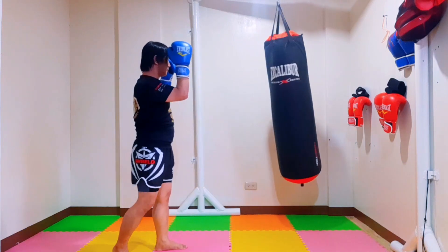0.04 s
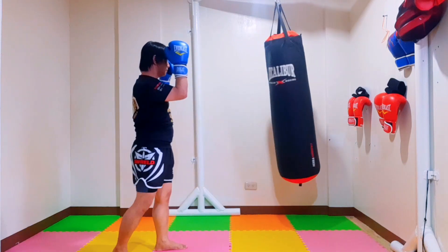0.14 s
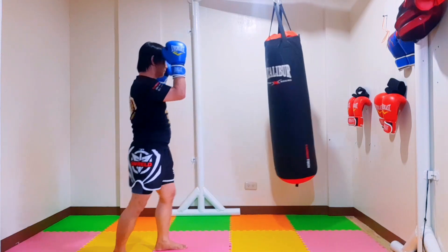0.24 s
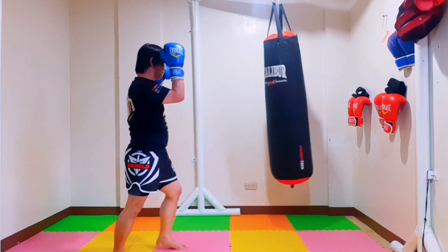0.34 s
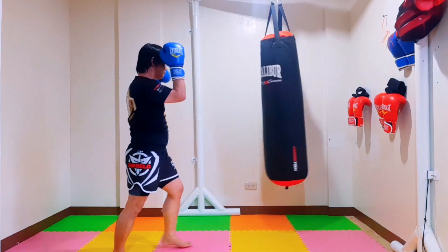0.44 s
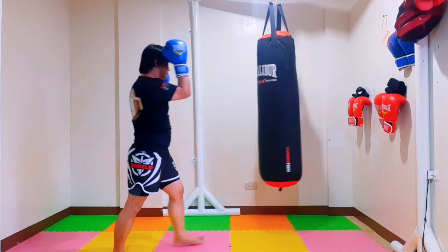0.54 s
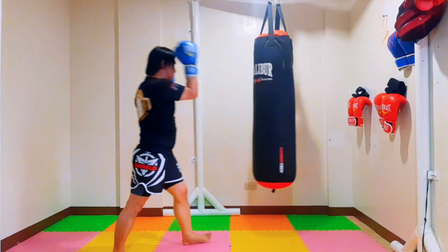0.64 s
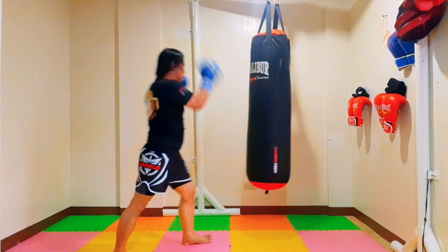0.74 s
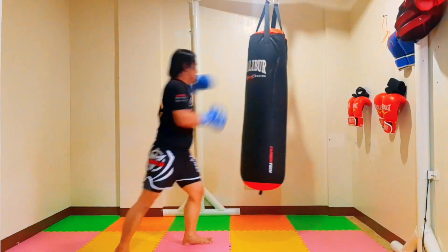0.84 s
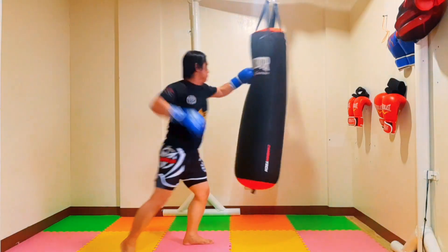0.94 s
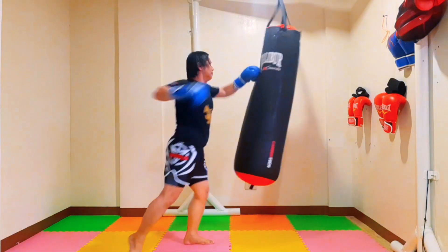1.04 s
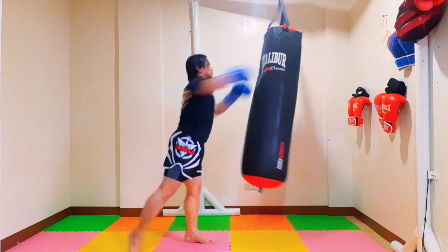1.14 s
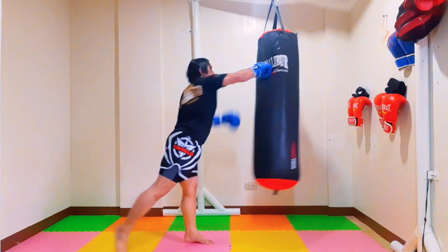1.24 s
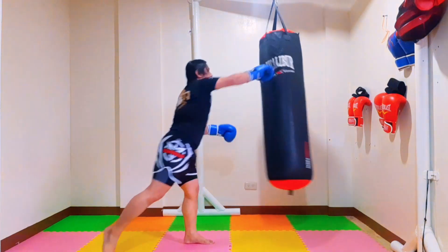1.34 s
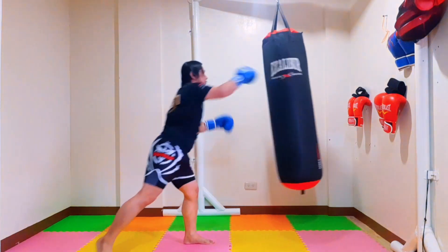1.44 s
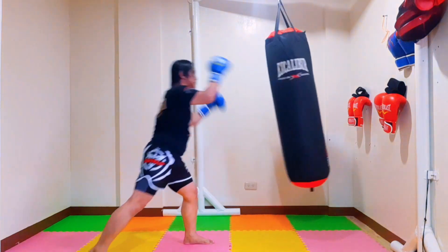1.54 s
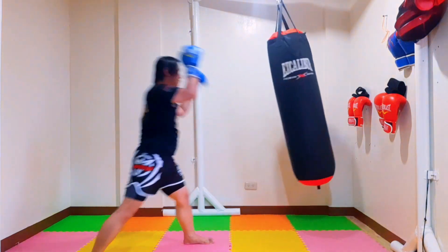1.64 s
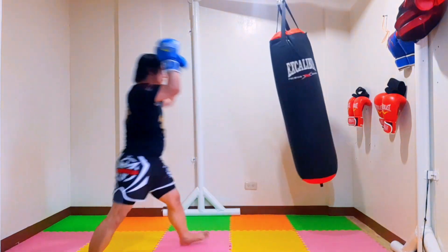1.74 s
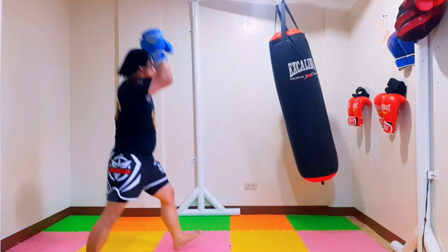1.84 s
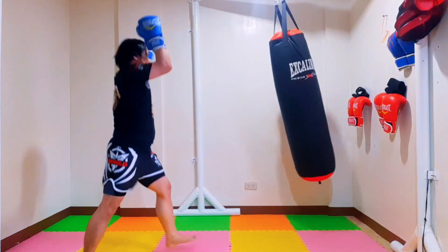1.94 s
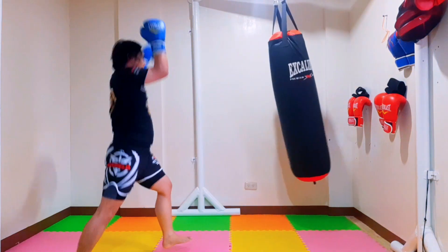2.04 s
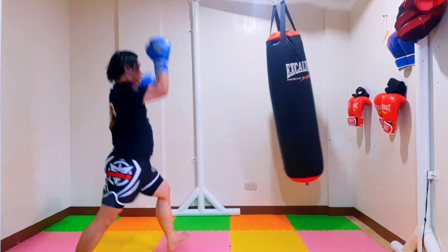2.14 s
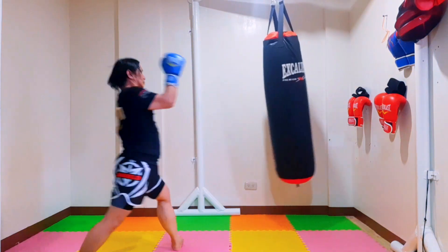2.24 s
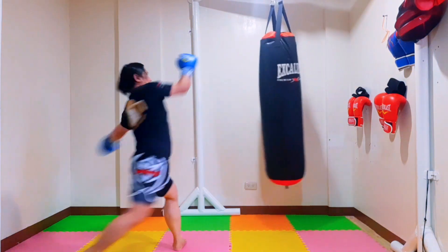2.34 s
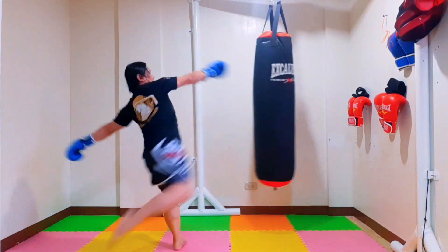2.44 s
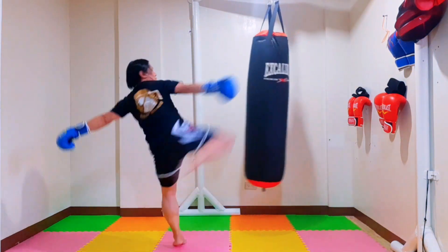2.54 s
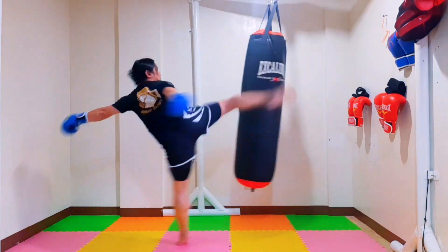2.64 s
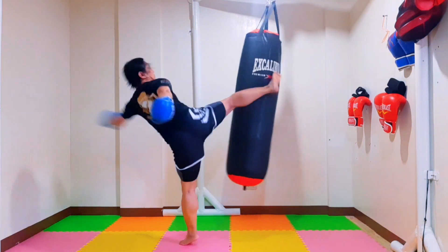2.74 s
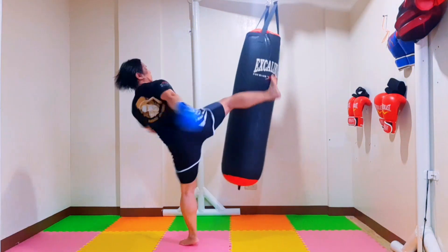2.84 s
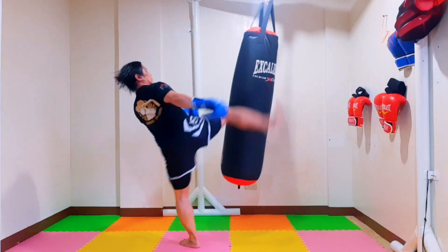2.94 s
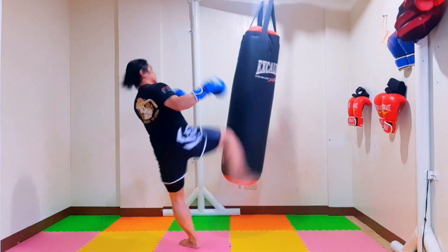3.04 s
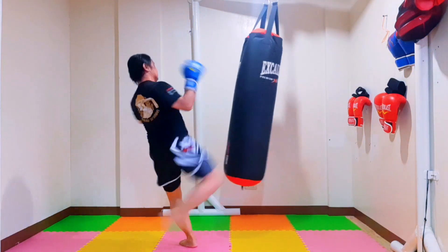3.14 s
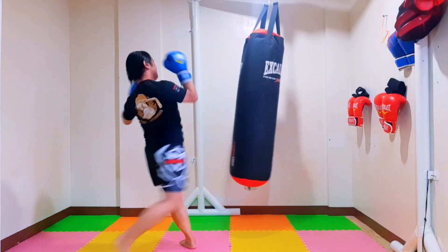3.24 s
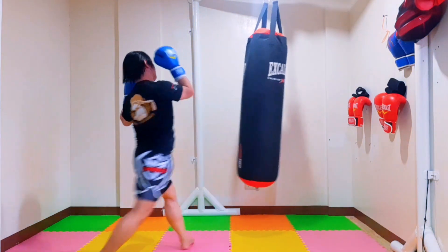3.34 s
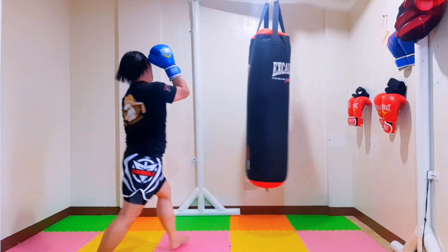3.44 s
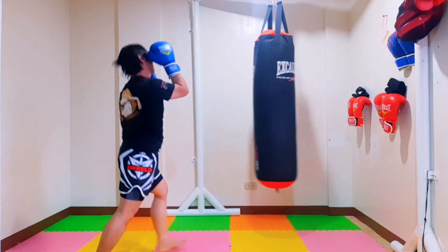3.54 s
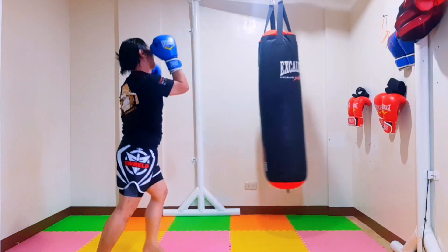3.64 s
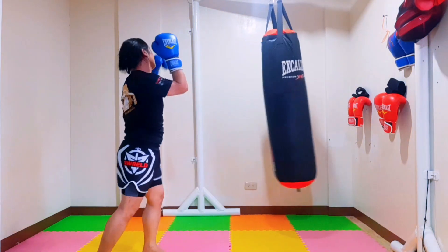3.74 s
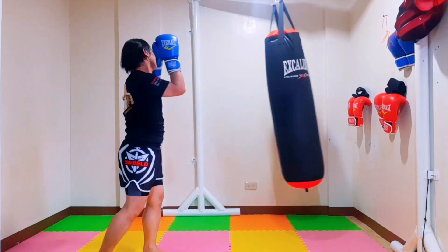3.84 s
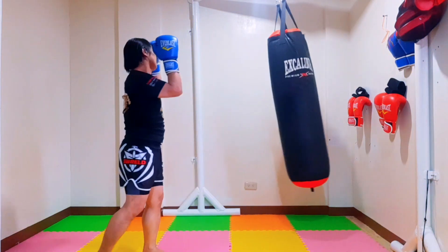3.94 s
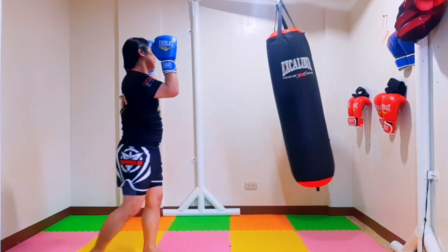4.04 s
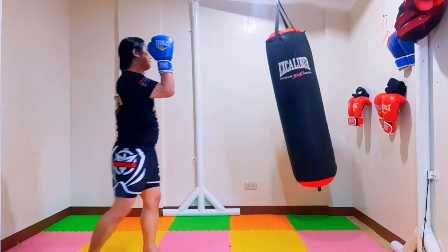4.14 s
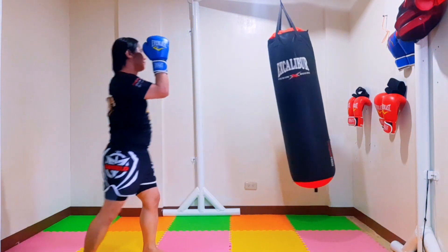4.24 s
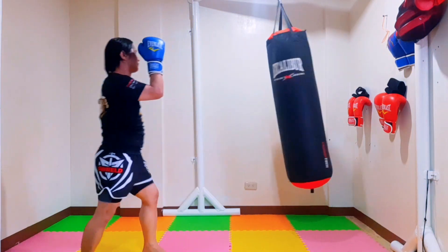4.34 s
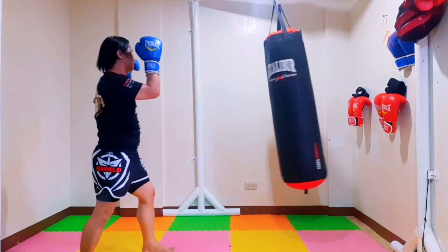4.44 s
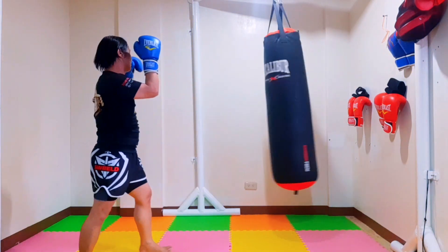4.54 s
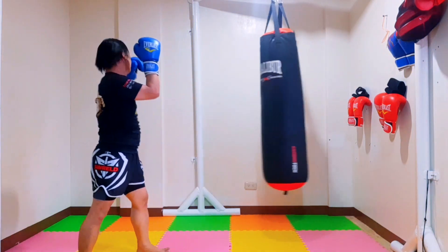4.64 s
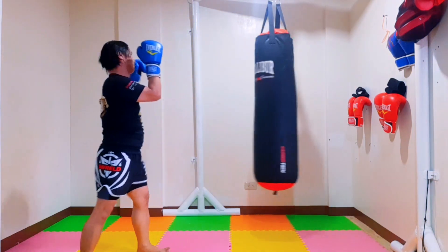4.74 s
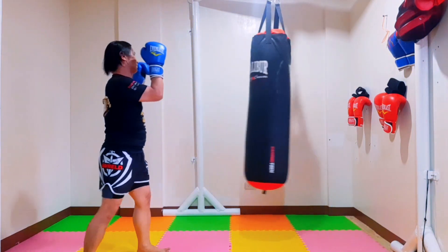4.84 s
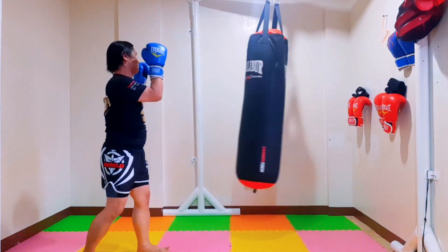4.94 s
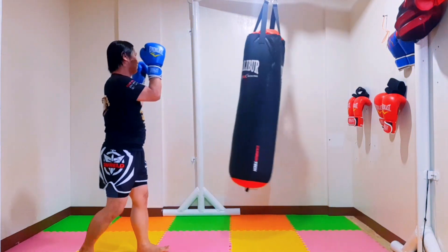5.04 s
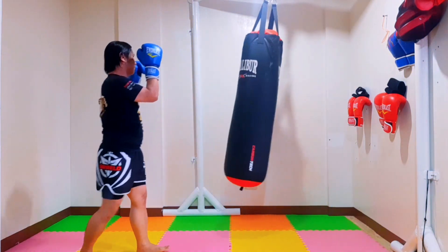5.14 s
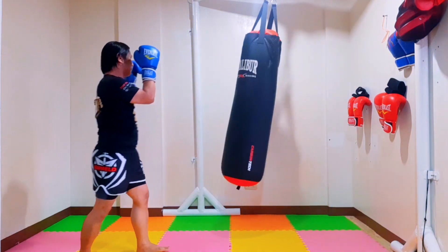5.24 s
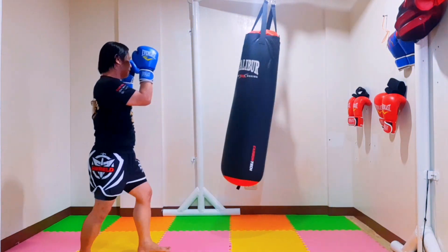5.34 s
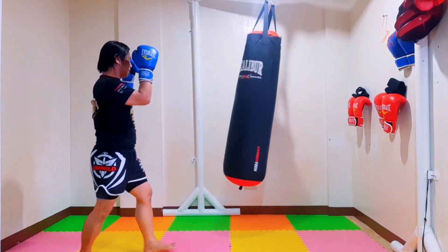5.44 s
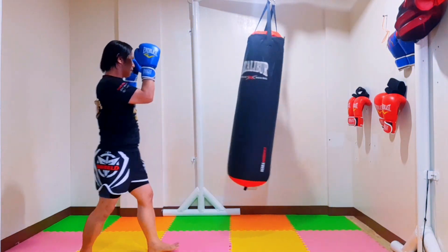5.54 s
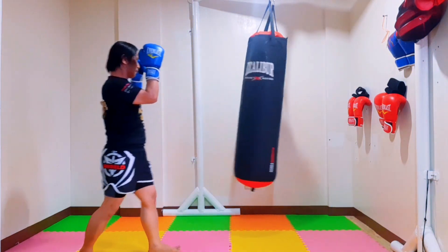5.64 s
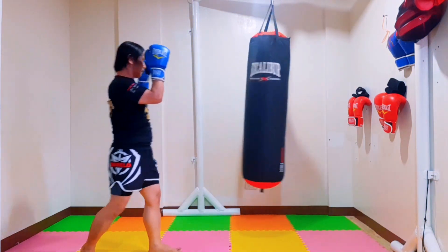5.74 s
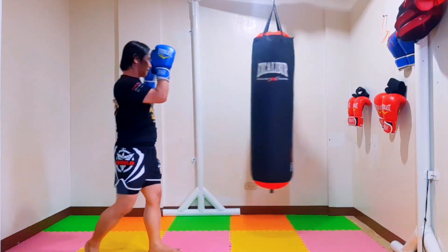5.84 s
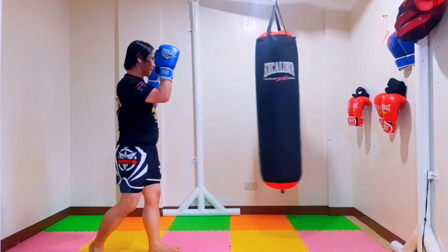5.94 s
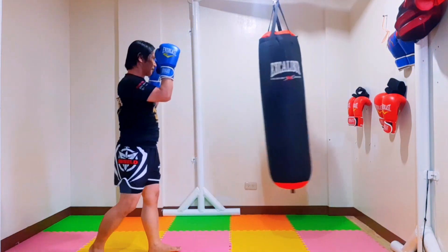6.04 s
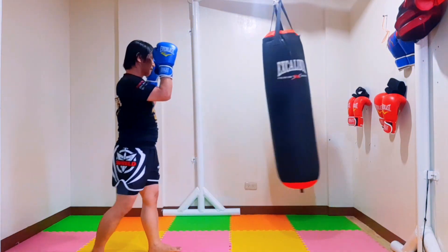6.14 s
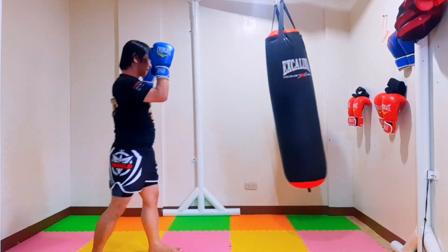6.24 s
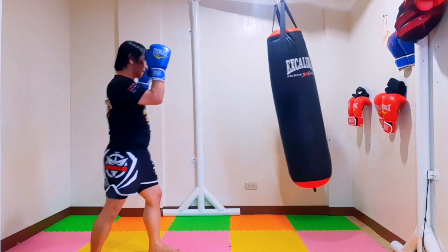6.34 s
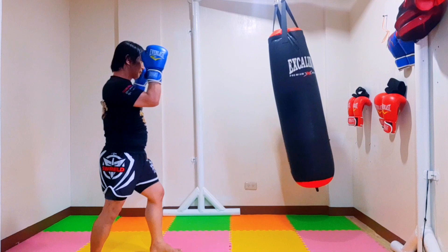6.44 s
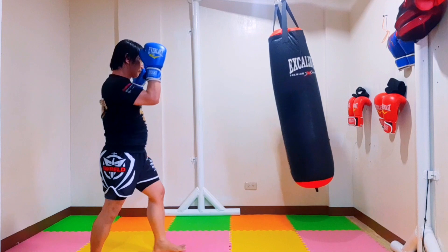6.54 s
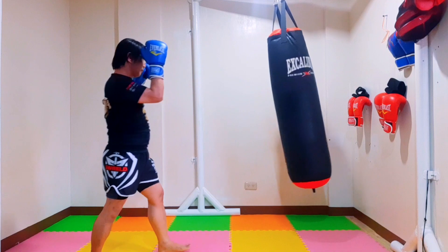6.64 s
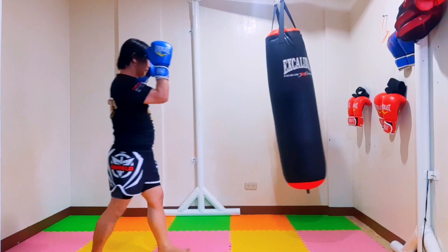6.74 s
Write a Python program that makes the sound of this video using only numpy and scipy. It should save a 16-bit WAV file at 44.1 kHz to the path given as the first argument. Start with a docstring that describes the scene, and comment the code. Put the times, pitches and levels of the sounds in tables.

```python
"""Small, bare training room: two gloved punches and a kick land on a hanging heavy bag.
Each blow is an air snap and clicks on the cover, a filtered push on the filling and ringing room modes.
It jolts the hanger (resonant knocks) and ceiling (a low drone); both shake again as the bag drops back.
Bare feet scuff on foam mats and clothes swish (random slips), with small taps and faint room air."""
import sys
import numpy as np
from scipy import signal
from scipy.fft import rfft, irfft
from scipy.io import wavfile
from scipy.ndimage import uniform_filter1d

SR = 44100
rng = np.random.default_rng(int(sys.argv[2]) if len(sys.argv) > 2 else 0)


def wav_out(sig):
    """Save sig, one row per channel (or a flat mono array), as 16-bit PCM at SR to the path in sys.argv[1]."""
    wavfile.write(sys.argv[1], SR, np.round(np.clip(np.atleast_2d(sig).T, -1, 1) * 32767).astype(np.int16))


N = 299880
TIME = np.arange(N) / SR

# room background: (frequency [Hz], level [dB])
AIR_SPECTRUM = [(18, -55), (30, -22.5), (103, 14.5), (194, 4.5), (245, 6), (303, -4), (554, -9.5),
                (616, -18.5), (2410, -20), (8520, -28.5), (14800, -20.5), (16000, -21.5)]
# decay of the late room tail: (frequency [Hz], t60 [s])
ROOM_T60 = [(40, 0.46), (75, 1), (130, 0.54), (300, 0.73), (700, 0.56), (2000, 0.47), (5000, 0.49),
            (14000, 0.46)]
# likeness of the two channels: (frequency [Hz], left-right correlation [-1..1])
STEREO_CORRELATION = [(50, 0.68), (130, 1), (260, 0.5), (500, 0.49), (1000, 0.047), (4000, 0.044),
                      (14000, 0.025)]
# side lean of the room: (frequency [Hz], left over right [dB])
STEREO_BALANCE = [(40, 18), (130, 12.5), (260, 2), (1000, 2.5), (2500, 4), (8000, 1.4), (13000, -1.5)]
# swishes of cloth: (time of peak [s], level [dB])
SWISHES = [(0.048, -55.5), (0.319, -56.5), (0.434, -56), (0.75, -65.5), (0.861, -52.5), (1.117, -43),
           (1.431, -58), (1.66, -55), (1.793, -45.5), (1.973, -53.5), (2.16, -61.5), (2.405, -46),
           (2.89, -46.5), (3.13, -63.5), (3.32, -51), (3.371, -55.5), (3.672, -57), (3.955, -57.5),
           (4.1, -62.5), (4.34, -61.5), (4.416, -53.5), (4.681, -65), (4.865, -55), (5.121, -57.5),
           (5.313, -52.5), (5.842, -53), (6.201, -61.5), (6.392, -55)]
# colour of rubbing cloth: (frequency [Hz], level [dB])
CLOTH_SPECTRUM = [(530, -28.5), (900, -11), (1390, -8.5), (2540, -2), (3300, -8.5), (3730, -4.5),
                  (12100, -8.5), (16000, -14)]
# shuffling of the soles between steps: (time [s], level [dB])
SHUFFLE = [(0, -64.5), (.4, -83.5), (1.7, -60.5), (3.55, -77.5), (4.3, -65.5), (5.5, -86.5), (5.85, -70),
           (6.05, -96), (6.35, -67), (6.7, -91.5)]
# steps on the mats, dull padding heel to bright scuffing ball:
# (time [s], level [dB], brightness [dB], length [s])
STEPS = [(0.0, -50.5, -35, 0.019), (0.056, -51, 11, 0.036), (0.145, -52, 2, 0.024),
         (0.705, -49.5, -14, 0.068), (0.784, -44, 1.5, 0.082), (1.413, -34, 9, 0.012),
         (1.798, -46.5, 20, 0.075), (2.272, -47.5, 32, 0.025), (2.407, -46.5, 6, 0.024),
         (2.503, -36.5, 10.5, 0.024), (2.649, -27.5, 8.5, 0.014), (2.927, -35, 3.5, .03),
         (3.236, -40, -3.5, .018), (3.296, -43, 0, 0.049), (3.377, -30, 4.5, 0.012),
         (3.649, -53.5, 8.5, 0.062), (3.749, -43.5, 3.5, 0.062), (4.041, -52, -2.5, 0.057),
         (4.279, -55, -26, 0.032), (4.603, -53, 17, 0.044), (4.771, -48.5, -18.5, 0.032),
         (4.904, -48.5, 9, 0.015), (5.069, -54, -12, 0.064), (5.118, -55, 7, 0.062),
         (5.594, -65.5, 23.5, 0.035), (6.179, -52, 11.5, 0.052), (6.402, -49.5, 20.5, 0.022),
         (6.735, -55, 12.5, .035)]
# colour of a sole on foam: (frequency [Hz], level [dB])
SOLE_SPECTRUM = [(60, -14.5), (200, -7), (380, 2), (650, 0), (950, -2.5), (1400, -6.5), (2200, -7.5),
                 (4000, -17.5), (6500, -26), (15000, -35.5)]
# sharp taps of toes and gloves: (time [s], level [dB], centre [Hz], decay to 1/e [s])
TAPS = [(0.056, -27.5, 7640, 0.00031), (0.785, -42.5, 2700, 0.0032), (2.506, -32, 2190, 0.0023),
        (2.927, -36.5, 3900, 0.0044), (3.751, -43, 1300, 0.0043), (4.279, -45.5, 10800, 0.004),
        (4.422, -27.5, 8100, 0.00017), (6.397, -36.5, 6030, 0.0014)]
# creaks of the hanger: (time [s], level [dB], pitch [Hz], length [s])
CREAKS = [(0.548, -67, 970, 0.04), (2.116, -41.5, 724, 0.013), (3.753, -49, 2040, 0.065),
          (3.754, -55.5, 3630, 0.043), (4.04, -47, 4150, 0.013), (4.157, -51.5, 580, 0.041),
          (4.273, -49, 3700, 0.019)]
# hanger resonances: (frequency [Hz], width [Hz], level [dB])
HANGER_MODES = [(322, 100, 14.5), (407, 45, 11), (608.4, 140, 1.5), (710, 87, -5), (940, 61, -10.5),
                (1480, 450, -11.5)]
# bag dropping back into its straps:
# (time of peak [s], hanger rattle [dB], ceiling drone [dB], half length [s])
REBOUNDS = [(1.662, -44, -55, .08), (3.429, -69, -55, .06)]
# blows: (time [s], heave [dB], thud [dB], knock [dB], smack [dB], slap [dB], first crack [dB],
# boom [dB], contact time [s], tail length [factor], hanger rattle [dB], ceiling drone [dB])
BLOWS = [(0.9331, -5.5, -5, 0, 0, 1.5, -10, -7, 0.00029, 0.68, -36, -46.5),
         (1.2029, -7.5, -4, -10, 0.5, 2.5, -6, 2, 0.0023, 0.62, -18, -46.5),
         (2.6880, 1, -1, 2.5, 7, 5, 0.5, -7.5, 0.0057, 0.8, -30, -37.5)]
# colour of a blow on the bag: (frequency [Hz], level [dB])
BAG_SPECTRUM = [(22, 8.5), (36, 30), (56, 20.5), (95, 31), (150, 33), (220, 41), (380, 31), (600, 24),
                (1100, 18.5), (2400, 12), (4500, 9.5), (8500, 3), (12000, 3), (16000, -4)]
# gaps between standing waves at the microphones: (frequency [Hz], width [Hz])
ROOM_NULLS = [(52, 11), (166, 3), (210, 13)]
# resonances of the room and the bag's shell: (frequency [Hz], level [dB], t60 [s])
BOOM_MODES = [(36.5, -35, 0.23), (67, -36, 0.48), (90.85, -31, 0.52), (110.5, -26, 1), (153.2, -19.5, 0.38),
              (182.5, -22.5, 1), (235, -17, 0.42), (296.7, -29.5, 0.25), (347.5, -27, 0.42),
              (417, -27.5, 0.25), (439.5, -25.5, 0.26), (624, -35, 0.28), (740, -34, 0.58),
              (1005, -36, .45), (1120, -36, 0.075)]
# nearest surfaces: (delay [s], left [dB], right [dB])
ECHOES = [(.0027, -10, 4), (.0064, -11, -18.5)]
# colour of the cover's clicks: (frequency [Hz], level [dB])
CRACKLE_SPECTRUM = [(300, -7), (1500, 3.5), (4000, -5.5), (8500, -12.5), (12000, 5.5), (16000, -9)]

AIR_GAIN_DB = -77
SWISH_HALF_S = 0.015
CLOTH_OVER_SHUFFLE_DB = -7
SHUFFLE_SLIPS_PER_S, SHUFFLE_UNEVEN_DB = 400, 5.5
PAD_HZ, SCUFF_HZ = 617.4, 2140  # brightness tilts a step between these
STEP_ATTACK_S = 0.0044
TOUCH_DB, TOUCH_S = 3.5, 0.0024  # first touch of a step, on top of its rub
JOLT_RISE_S = 0.016  # time for a blow to work up to the mount
RATTLE_T60_S, DRONE_T60_S = 0.6, 1.3
CEILING_HZ, CEILING_WANDER_HZ = 36.5, 1.4
FLEX_DB, FLEX_T60_S = 18.5, 0.19  # first heavy flex, above the drone
CUTOFF_HZ = 16900


def from_db(db):
    """Decibels to gain."""
    return 10 ** (np.asarray(db) / 20)


def rms_one(x):
    """Scale to an rms of one."""
    return x / np.sqrt(np.mean(x ** 2) + 1e-20)


def at_hz(points, hz):
    """Read a table along log frequency."""
    f, value = np.transpose(points)
    return np.interp(np.log(np.maximum(hz, 1)), np.log(f), value)


def gain_curve(rows):
    """(time [s], level [dB]) rows to a gain per sample."""
    return from_db(np.interp(TIME, *np.transpose(rows)))


def add(out, s, x):
    """Mix x into out from time s on."""
    i = max(round(s * SR), 0)
    out[..., i:i + x.shape[-1]] += x[..., :N - i]


def shaped(x, spectrum, size=8192):
    """Causal (minimum-phase) filter with the given (Hz, dB) response."""
    log_gain = np.log(from_db(at_hz(spectrum, np.fft.rfftfreq(size, 1 / SR))))
    cepstrum = irfft(log_gain)
    # folding the cepstrum gives minimum phase
    cepstrum[1:size // 2] *= 2
    cepstrum[size // 2 + 1:] = 0
    impulse = irfft(np.exp(rfft(cepstrum)))
    return signal.fftconvolve(x, impulse)[:len(x)]


def resonate(x, hz, width_hz):
    """One resonance with gain one at its top."""
    r = np.exp(-np.pi * width_hz / SR)
    zeros = np.array([1, 0, -1]) * (1 - r * r) / 2
    poles = [1, -2 * r * np.cos(2 * np.pi * hz / SR), r * r]
    return signal.lfilter(zeros, poles, x + 1e-18)


def grains(n, per_s, spread_db):
    """Random tiny slips of uneven size."""
    happens = rng.random(n) < per_s / SR
    sign = rng.choice([-1, 1], n)
    return happens * sign * from_db(spread_db * (rng.random(n) - .5))


def evened(x, size=2205):
    """Take the slow swells out of a noise, so that its decay runs steadily."""
    return x / np.sqrt(uniform_filter1d(x ** 2, size, axis=-1, mode="wrap") + 1e-12)


def swell(s, half_s):
    """Smooth rise and fall around time s."""
    return 1 / np.cosh(np.clip((TIME - s) / half_s, -30, 30))


def jolt(s, t60_s):
    """Shaking that builds up after a blow at time s and dies away."""
    t = np.maximum(TIME - s, 0)
    return (1 - np.exp(-(t / JOLT_RISE_S) ** 2)) * from_db(-60 * t / t60_s)


def room_response(early_share, early_t60_s, build_s, stretch=1, size=40960):
    """Diffuse stereo echo: a quick first decay, then a tail whose length depends on frequency."""
    t, hz = TIME[:size], np.fft.rfftfreq(size, 1 / SR)
    centres = np.geomspace(30, 16000, 16)
    white = rfft(rng.standard_normal((2, size)))
    share, out = np.clip(early_share, 0, .97), 0
    early = share * from_db(-60 * t / early_t60_s) ** 2  # energy
    build = 1 - np.exp(-t / build_s)
    for fc, pick in zip(centres, np.eye(len(centres))):
        band = at_hz(np.c_[centres, pick], hz)
        late_t60_s = stretch * at_hz(ROOM_T60, fc)
        late = (1 - share) * from_db(-60 * t / late_t60_s) ** 2
        mid, side = evened(irfft(white * band)) * np.sqrt(early + late) * build
        alike = np.clip(at_hz(STEREO_CORRELATION, fc), 0, 1)
        common = np.sqrt(1 + alike) * rms_one(mid)
        opposed = np.sqrt(1 - alike) * rms_one(side) * np.array([[1], [-1]])
        lean = from_db(at_hz(STEREO_BALANCE, fc) * np.array([[.5], [-.5]]))
        out = out + (common + opposed) * np.sqrt(band.mean() / size / 2) * lean
    return out


def in_room(x, response):
    """A sound as it reaches the two microphones."""
    return signal.fftconvolve(x[None], response, axes=1)[:, :len(x)]


def still_air():
    """Faint steady room noise, partly common to both sides."""
    left, right, common = (rms_one(shaped(rng.standard_normal(N), AIR_SPECTRUM)) for _ in range(3))
    return from_db(AIR_GAIN_DB) * (np.array([left, right]) + common) / np.sqrt(3 / 2)


def clothes():
    """Shorts and shirt rub in a swell with every move, and stir faintly as the feet shuffle."""
    speed = sum(from_db(db) * swell(s, SWISH_HALF_S) for s, db in SWISHES)
    speed = speed + from_db(CLOTH_OVER_SHUFFLE_DB) * gain_curve(SHUFFLE)
    return speed * rms_one(shaped(grains(N, 2500, 22), CLOTH_SPECTRUM))


def feet(size=16384):
    """A sole pads down and rubs over the foam in dense dying slips; between steps it shuffles unevenly."""
    t = TIME[:size]
    wander = rms_one(resonate(resonate(rng.standard_normal(N), 4.3, 8), 4.3, 8))
    rub = rms_one(shaped(grains(N, SHUFFLE_SLIPS_PER_S, 21), SOLE_SPECTRUM))
    out = gain_curve(SHUFFLE) * from_db(SHUFFLE_UNEVEN_DB * wander) * rub
    for s, db, bright_db, length_s in STEPS:
        slips = shaped(grains(size, 900, 24), SOLE_SPECTRUM)
        slips = shaped(slips, [(PAD_HZ, 0), (SCUFF_HZ, bright_db)])
        pressure = np.exp(-(t / length_s) ** 2) + from_db(TOUCH_DB) * np.exp(-t / TOUCH_S)
        attack = 1 - np.exp(-t / STEP_ATTACK_S)
        add(out, s, from_db(db) * rms_one(slips) * attack * pressure)
    return out


def taps(size=4096):
    """Each tap is a brief, decaying clatter around one broad pitch."""
    out = np.zeros(N)
    for s, db, hz, decay_s in TAPS:
        clatter = rms_one(resonate(rng.standard_normal(size), hz, hz))
        add(out, s, from_db(db) * clatter * np.exp(-TIME[:size] / decay_s))
    return out


def hanger(size=16384):
    """The mount chatters dully after blows and rebounds; under the swinging load its hook sticks and slips."""
    shaking = sum(from_db(rattle_db) * jolt(s, RATTLE_T60_S) for s, *_, rattle_db, _ in BLOWS)
    shaking = shaking + sum(from_db(rattle_db) * swell(s, half_s) for s, rattle_db, _, half_s in REBOUNDS)
    lowpass = signal.butter(2, 1700, fs=SR, output="sos")
    knocks = signal.sosfilt(lowpass, grains(N, 220, 8.5) + 1e-18)
    rattle = sum(from_db(db) * resonate(knocks, hz, width_hz) for hz, width_hz, db in HANGER_MODES)
    out = shaking * rms_one(rattle)
    for s, db, hz, length_s in CREAKS:
        squeak = resonate(resonate(grains(size, 1500, 5), hz, 0.16 * hz), hz, 0.16 * hz)
        add(out, s, from_db(db) * rms_one(squeak) * np.exp(-(TIME[:size] / length_s) ** 2))
    return out


def ceiling():
    """Lowest ceiling mode: blows flex it hard and leave it droning; the weight dropping back shakes it."""
    load = 0
    for s, *_, drone_db in BLOWS:
        flex = from_db(FLEX_DB) * jolt(s, FLEX_T60_S)
        load = load + from_db(drone_db) * (jolt(s, DRONE_T60_S) + flex)
    for s, _, drone_db, half_s in REBOUNDS:
        load = load + from_db(drone_db) * swell(s, half_s)
    wander = rms_one(resonate(rng.standard_normal(N), 1.8, 3))
    phase = 2 * np.pi * np.cumsum(CEILING_HZ + CEILING_WANDER_HZ * wander) / SR
    return load * np.sqrt(2) * np.sin(phase) * from_db([[2.2], [-3.5]])


def room_boom(t, swell_s=0.0096, lean_db=2.5):
    """Standing waves build up, then ring on."""
    waves = 0
    for hz, db, t60_s in BOOM_MODES:
        waves = waves + from_db(db - 60 * t / t60_s) * np.sin(2 * np.pi * (hz * t + rng.random()))
    return waves * (1 - np.exp(-t / swell_s)) * from_db([[lean_db], [-lean_db]])


def cover_crackle(t, level_db=-25, peak_s=0.0029):
    """The vinyl slaps flat over a few milliseconds: bright clicks, scattered differently to each side."""
    clicks = np.array([rms_one(shaped(grains(len(t), 7600, 4.5), CRACKLE_SPECTRUM)) for _ in range(2)])
    return from_db(level_db) * clicks * t / peak_s * np.exp(1 - t / peak_s)


def cover_crack(t, snap_s=0.000058, push_db=-7, suction_s=0.0009):
    """Air squeezed out at first contact: a sharp snap on a short suction, echoed by the nearest surfaces."""
    suction = (1 - t / suction_s) * np.exp(-t / suction_s)
    pulse = -.6 * np.exp(-t / snap_s) - from_db(push_db) * suction
    out = pulse * from_db([[1.2], [-1.5]])
    for delay_s, left_db, right_db in ECHOES:
        out = out + np.interp(t - delay_s, t, pulse, left=0) * from_db([[left_db], [right_db]])
    return out


def blows(size=65536):
    """The filling takes a heavy push that fills the room, except in its nulls; the cover cracks and crackles."""
    out, t = np.zeros((2, N)), TIME[:size]
    push = shaped(signal.unit_impulse(size), BAG_SPECTRUM)
    for hz, width_hz in ROOM_NULLS:
        push = push - resonate(push, hz, width_hz)
    for (s, heave_db, thud_db, knock_db, smack_db, slap_db,
         crack_db, boom_db, contact_s, stretch, _, _) in BLOWS:
        colour = [(70, heave_db), (200, thud_db), (450, knock_db), (1100, smack_db), (9000, slap_db)]
        force = shaped(push, colour)
        room = room_response(early_share=0.34, early_t60_s=0.13, build_s=contact_s, stretch=stretch)
        thud = in_room(force, room)
        add(out, s, thud + from_db(crack_db) * cover_crack(t) + from_db(boom_db) * room_boom(t))
        add(out, s, cover_crackle(t[:size // 8]))
    return out


def scene(count=3):
    """Mount, feet and clothes rub at several spots at once, each with its own paths through the room."""
    small = 0
    for _ in range(count):
        room = room_response(early_share=0.84, early_t60_s=.29, build_s=0.00055)
        room[:, 0] += .36  # direct path
        small = small + in_room(hanger() + feet() + taps() + clothes(), room) / np.sqrt(count)
    left, right = blows() + small + ceiling() + still_air()
    return np.array([np.roll(left, 3), right])  # sound reaches the right microphone 3 samples sooner


def record(dry):
    """Round the highest peaks and cut the top."""
    limited = dry / (1 + dry ** 6) ** (1 / 6)
    return signal.sosfilt(signal.cheby2(16, 70, CUTOFF_HZ, fs=SR, output="sos"), limited)


dry = scene()
out = record(dry)
wav_out(out)
```